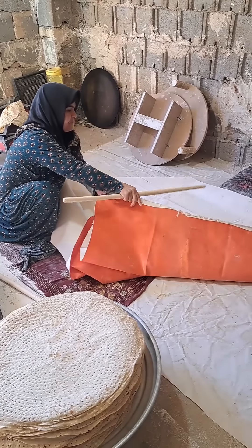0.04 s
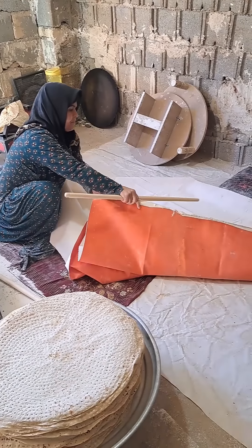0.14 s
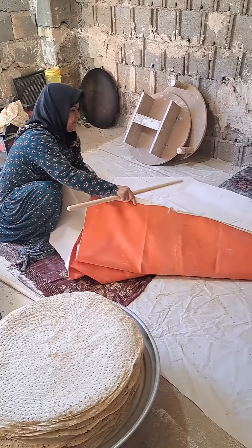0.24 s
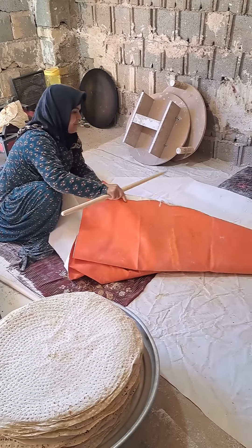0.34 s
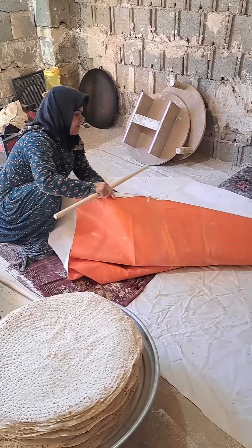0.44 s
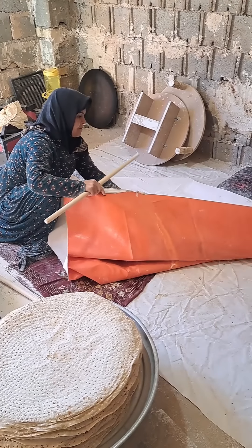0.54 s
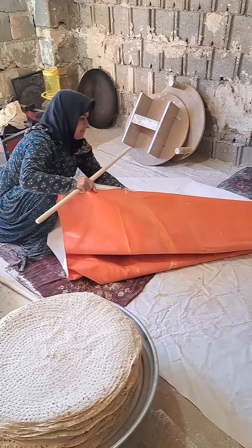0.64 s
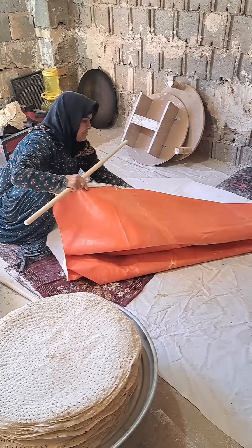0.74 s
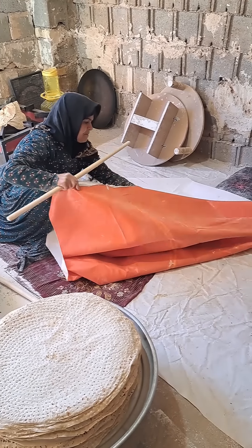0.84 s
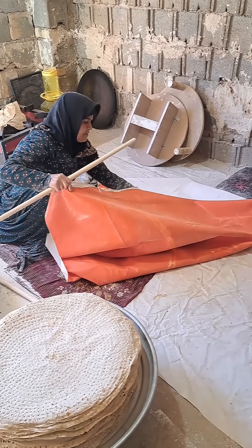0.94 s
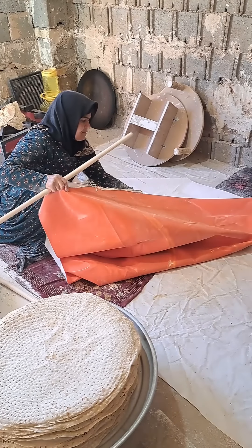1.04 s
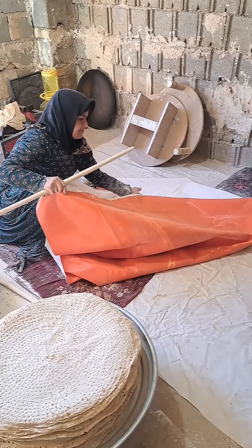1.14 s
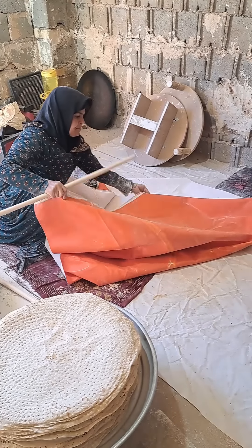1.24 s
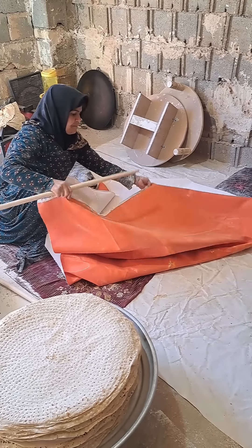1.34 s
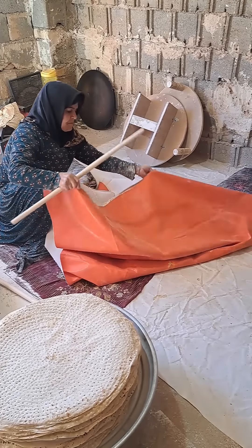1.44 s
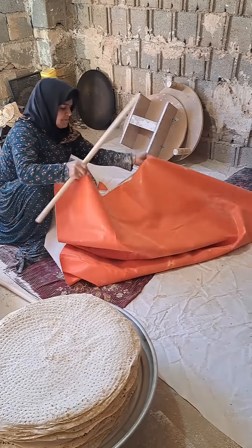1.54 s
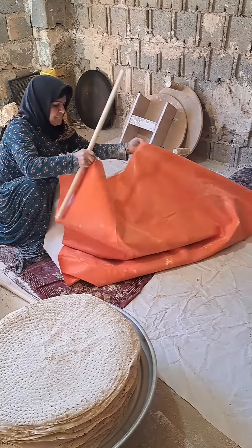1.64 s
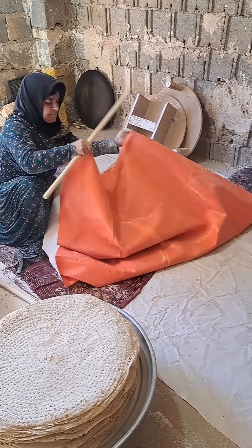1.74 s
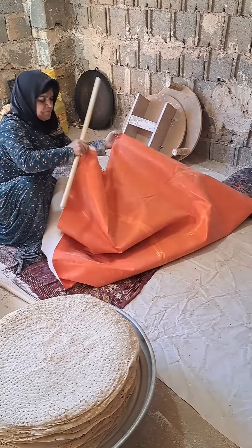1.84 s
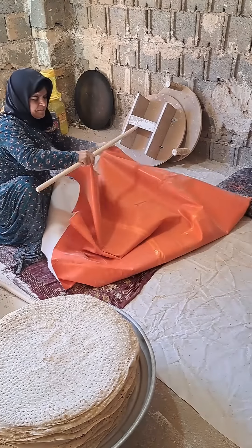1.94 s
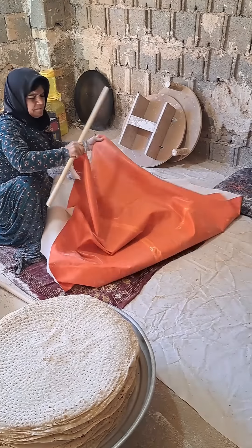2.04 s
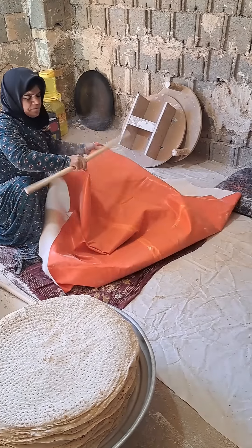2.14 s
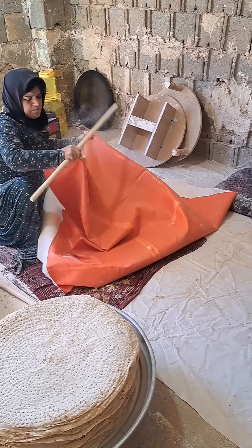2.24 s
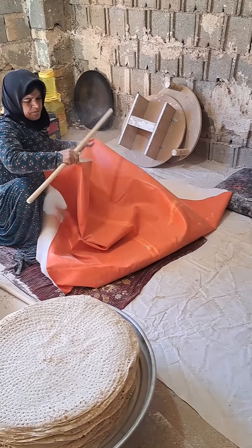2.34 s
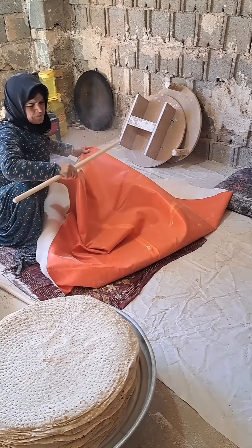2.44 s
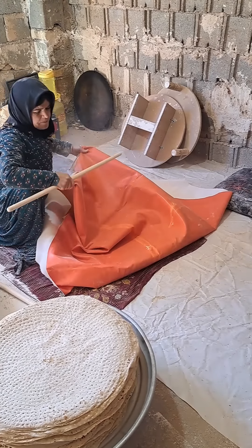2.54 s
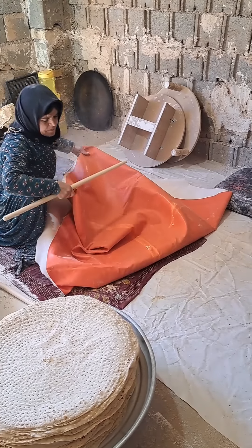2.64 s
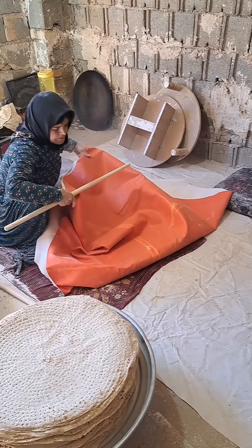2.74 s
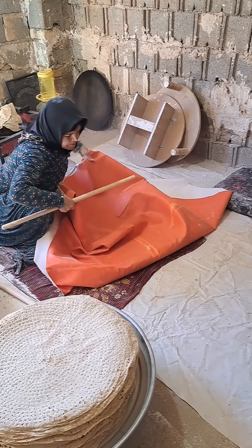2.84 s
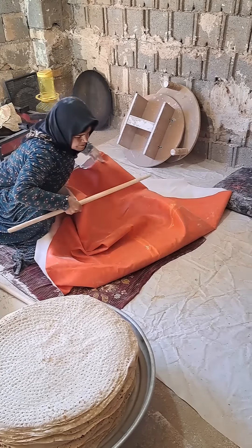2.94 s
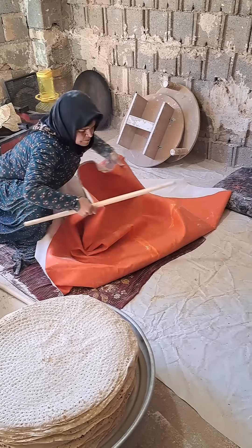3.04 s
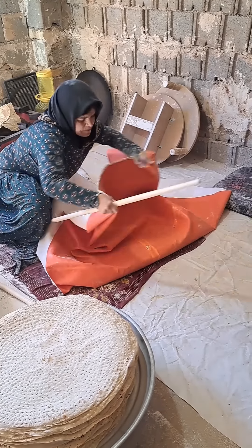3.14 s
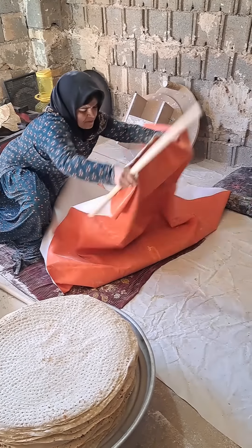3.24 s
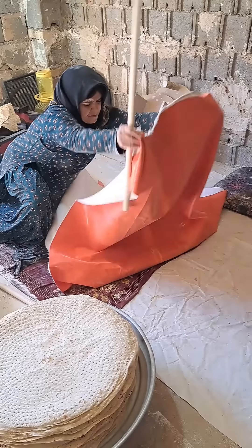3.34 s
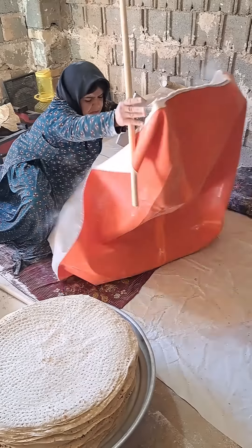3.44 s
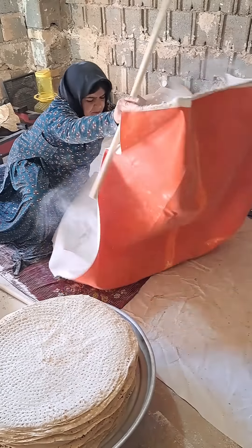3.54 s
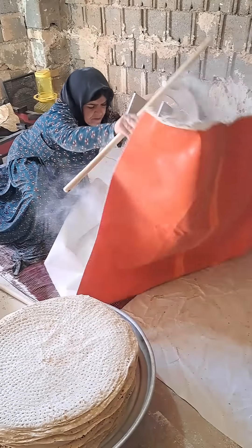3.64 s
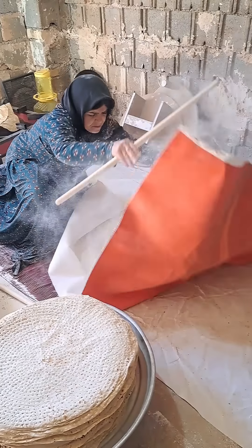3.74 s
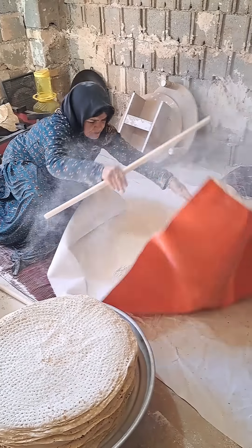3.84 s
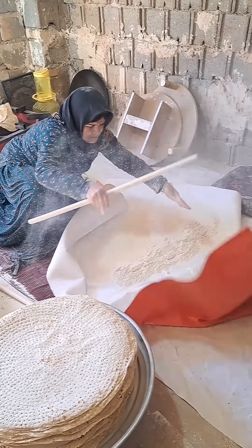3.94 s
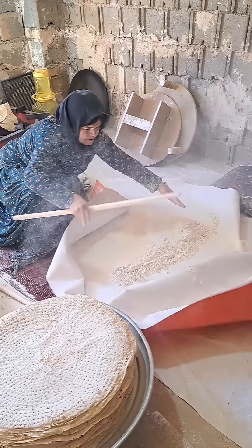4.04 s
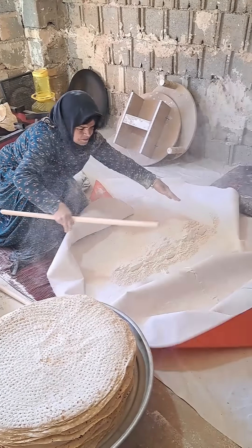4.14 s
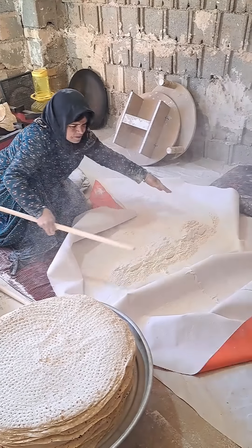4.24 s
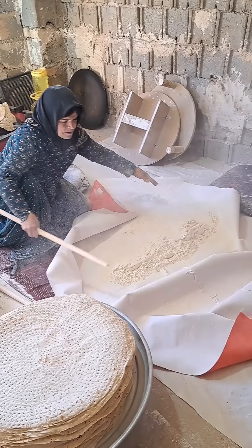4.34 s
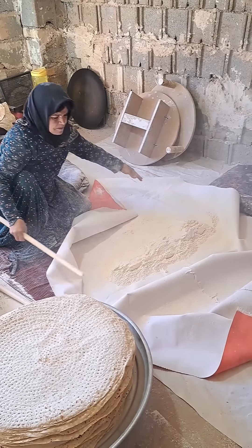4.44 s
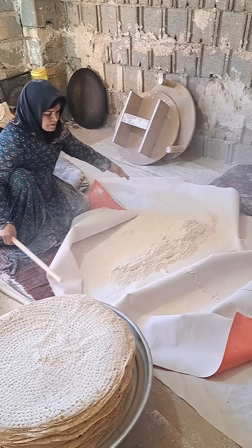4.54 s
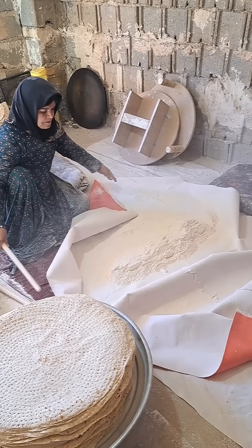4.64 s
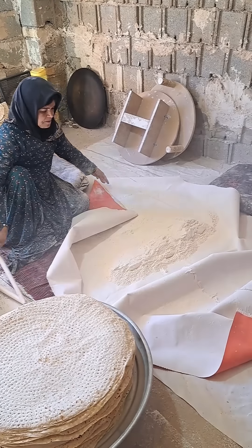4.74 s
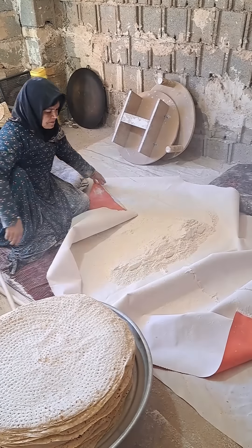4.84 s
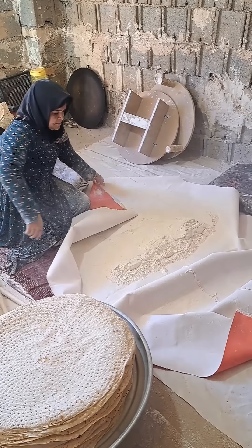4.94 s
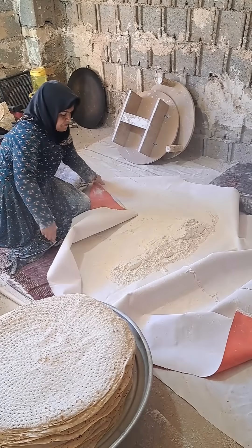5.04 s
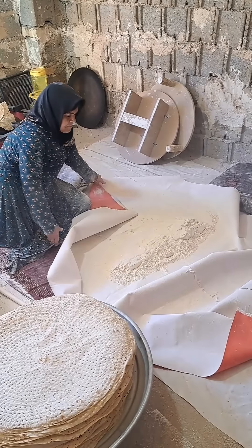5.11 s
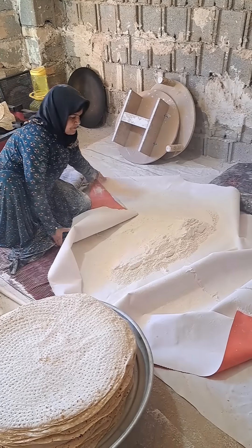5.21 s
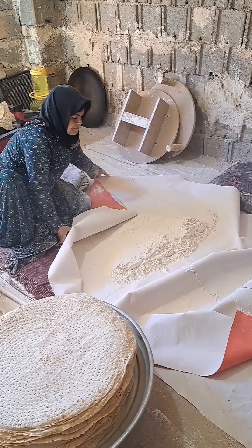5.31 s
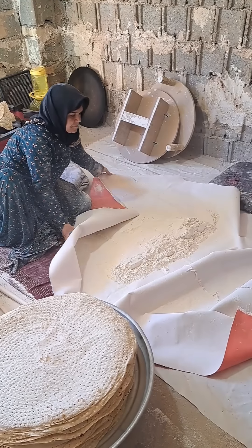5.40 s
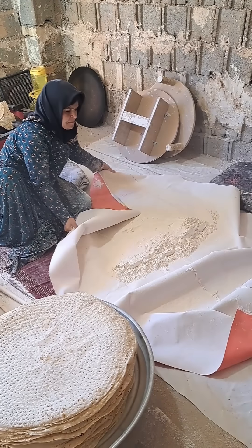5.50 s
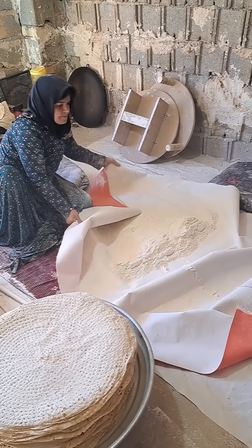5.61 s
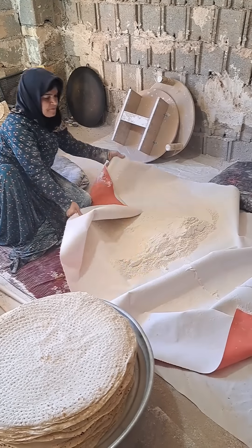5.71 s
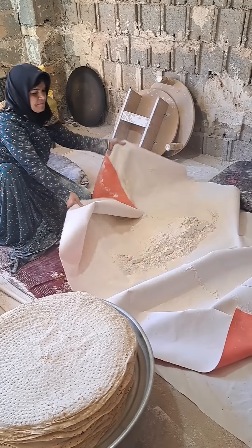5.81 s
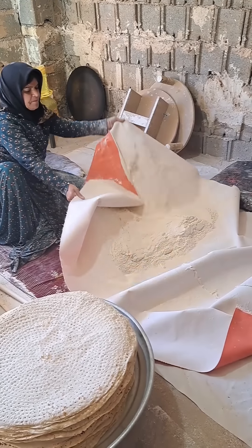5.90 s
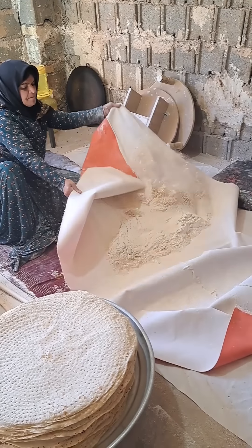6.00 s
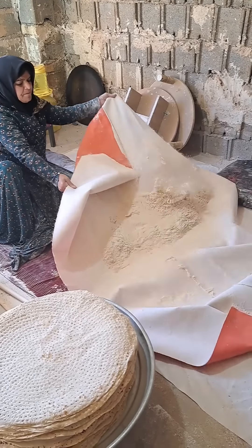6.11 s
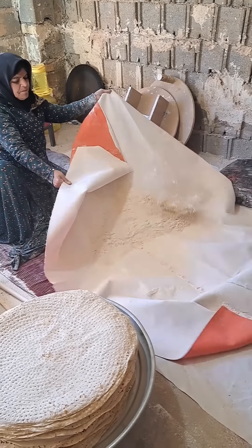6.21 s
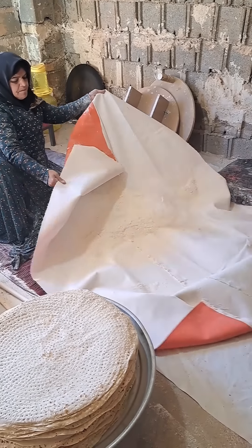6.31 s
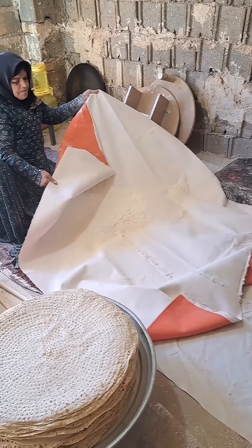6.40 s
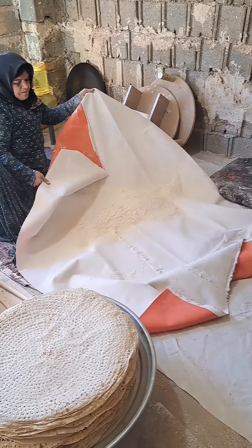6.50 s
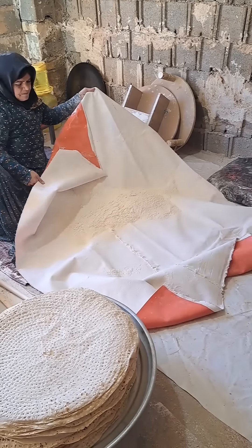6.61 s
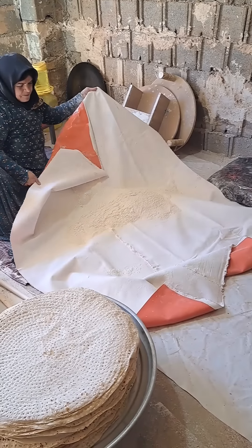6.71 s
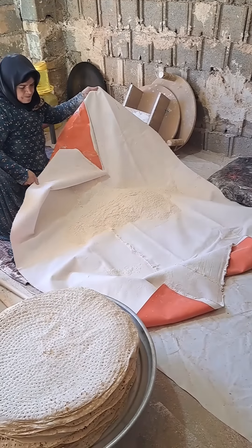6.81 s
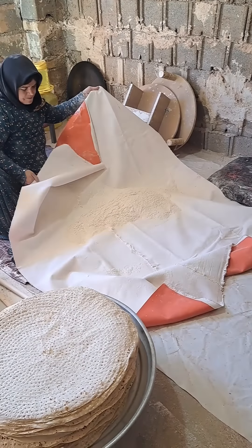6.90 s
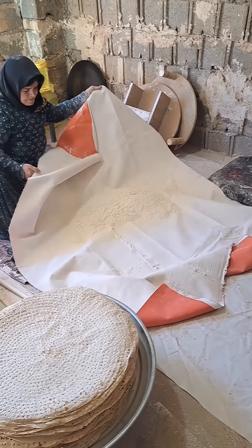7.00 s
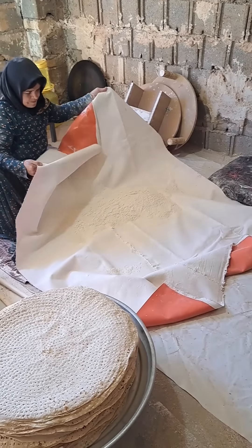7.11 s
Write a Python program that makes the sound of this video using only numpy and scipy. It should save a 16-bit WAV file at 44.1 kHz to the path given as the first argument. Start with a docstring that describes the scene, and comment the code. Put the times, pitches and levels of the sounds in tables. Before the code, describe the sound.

Stiff plastic sheet rustling and flapping with deep pops, a slap, sharp wooden knocks, soft floor bumps, then one long scraping slide indoors.

```python
"""A large plastic-coated cloth is handled in a small brick room, over quiet room air and a faint hum.
At first it is lifted and shaken: shaped noise and tiny clicks rustle, and a loose buzz marks the rubs.
Low noise puffs out from under it, folds pop taut (a crack and a short low tone) and the sheet slaps down.
Then a long wooden rolling pin drops and knocks about, with dull bumps on the floor, built from decaying
tones, with a short noisy clatter in the knocks. Last come a long drag over the floor, a few strokes and a rub."""
import sys
import numpy as np
from scipy import signal
from scipy.fft import rfft, irfft, next_fast_len
from scipy.io import wavfile

SR = 44100
rng = np.random.default_rng(int(sys.argv[2]) if len(sys.argv) > 2 else 0)


def generate_wav(sig):
    """Save sig (samples, or channels by samples) to the path in sys.argv[1] as 16-bit PCM at SR."""
    pcm = np.round(np.clip(np.atleast_2d(sig).T, -1, 1) * 32767).astype(np.int16)
    wavfile.write(sys.argv[1], SR, pcm)


N = 315756   # length of the scene in samples


def from_db(db):
    """Turn decibels into a gain."""
    return 10 ** (np.asarray(db) / 20)


def rms_one(x):
    """Scale a sound to an average strength (rms) of 1."""
    return x / np.sqrt(np.mean(x ** 2) + 1e-20)


def add(out, start, sound):
    """Mix a sound in at a time in seconds, cutting what runs past the end."""
    at = int(start * SR)
    out[..., at:at + sound.shape[-1]] += sound[..., :N - at]


def at_hz(points, hz):
    """Read a table between its points, with pitch spaced as the ear hears it (logarithmically)."""
    point_hz, value = np.transpose(points)
    return np.interp(np.log(hz + 1e-9), np.log(point_hz), value)


def low_pass(x, hz, order=2):
    """Keep what lies below a frequency (Butterworth filter)."""
    sections = signal.butter(order, min(hz, SR / 2 - 1000), fs=SR, output="sos")
    return signal.sosfilt(sections, x + 1e-18)


def drift(rate):
    """Wander by chance along straight lines between random points, 'rate' points a second; rms 1."""
    knots = rng.standard_normal(int(N / SR * rate) + 2)
    return rms_one(np.interp(np.arange(N) * rate / SR, np.arange(len(knots)), knots))


def colour(pair, spectrum):
    """Two unrelated signals become a stereo sound of this spectrum, alike in the bass; rms 1."""
    # How alike the two ears are. Each row: frequency in Hz, correlation (1 is identical).
    likeness = [(100, 0.91), (280, 0.94), (600, 0.35), (1200, 0), (2500, 0.1), (8000, 0)]
    size = next_fast_len(pair.shape[1])
    hz = np.arange(size // 2 + 1) * SR / size
    bass_cut = hz / np.hypot(hz, 20)   # fades out below about 20 Hz
    mid, side = rfft(pair, size) * from_db(at_hz(spectrum, hz)) * bass_cut
    alike = np.clip(at_hz(likeness, hz), -1, 1)
    both = np.sqrt(1 + alike) * mid + np.sqrt(1 - alike) * side * [[1], [-1]]
    return rms_one(irfft(both, size)[:, :pair.shape[1]])


def noise(spectrum, size=N):
    """Smooth stereo noise of this spectrum."""
    return colour(rng.standard_normal((2, size)), spectrum)


def grains(spectrum, per_s, spread_db, hiss_db):
    """Tiny slips and buckles of uneven size over a bed of smooth friction."""
    sizes = from_db(spread_db * np.minimum(rng.exponential(1, N), 4))
    happens = rng.random(N) < per_s / SR
    clicks = happens * sizes * rng.standard_normal((2, N))
    hiss = from_db(hiss_db) * rng.standard_normal((2, N))
    return colour(rms_one(clicks) + hiss, spectrum)


def struck(modes, t, spread_db, apart_hz=1100):
    """Decaying modes, shared differently by each blow; short waves reach the two ears out of step."""
    out = np.zeros((2, len(t)))
    for k, (hz, db, t60) in enumerate(modes):
        turn = min((hz / apart_hz) ** 2, 1) * rng.uniform(0, np.pi / 2) * np.array([[-1], [1]])
        fading = from_db(db + spread_db * rng.standard_normal() - 60 * t / t60)
        sign = (-1) ** k   # every other mode starts the opposite way
        out += sign * fading * np.sin(2 * np.pi * hz * t + turn)
    return out


def room(x, wet_db):
    """Direct sound plus the dense, short tail of brick walls, whose treble dies first."""
    # Colour of the tail. Each row: frequency in Hz, relative level in dB per Hz.
    wall_spectrum = [(60, -3.5), (250, 2), (700, -3.5), (4000, -4), (15000, 0.5)]
    # seconds to fall by 60 dB, for the dull and the bright part; where the two parts meet
    dull_t60, treble_t60, treble_hz = 0.22, 0.19, 2230
    t = np.arange(SR // 2) / SR
    air = noise(wall_spectrum, size=len(t))
    dull = low_pass(air, treble_hz, order=1)
    tail = dull * from_db(-60 * t / dull_t60) + (air - dull) * from_db(-60 * t / treble_t60)
    tail *= np.clip(t / 0.0027 - 1, 0, 1)   # silent for 2.7 ms, then fades in over as long
    tail /= np.sqrt(np.sum(tail ** 2) / 2)
    return x + from_db(wet_db) * signal.fftconvolve(np.atleast_2d(x), tail, axes=1)[:, :N]


def near_walls(pair, above_hz=700):
    """Early echoes from floor and near walls comb the upper range, differently at each ear."""
    # Each row: left delay in seconds, right delay in seconds, level in dB.
    echoes = [(.0021, 0.0012, -22.5), (.0047, 0.0065, -16.5), (.0093, 0.0067, -16.5), (0.013, 0.017, -20.5)]
    out = pair.copy()
    bright = pair - low_pass(pair, above_hz, order=1)
    for left_s, right_s, db in echoes:
        add(out[0], left_s, from_db(db) * bright[0])
        add(out[1], right_s, from_db(db) * bright[1])
    return out


def background():
    """Quiet room air as shaped noise, with a faint hum of steady level whose phase wanders."""
    # Colour of the room air. Each row: frequency in Hz, relative level in dB per Hz.
    air_spectrum = [(18, -47.5), (30, 0), (98, -2), (449, -8), (540, -11.5), (801, -3), (1220, -6),
                    (1460, 0), (1910, -21), (3220, -14), (3490, -19.5), (5040, -4.5), (8980, -16),
                    (12600, -15.5), (16000, -44)]
    # The hum. Each row: frequency in Hz, rms level in dB.
    hum_tones = [(113, -76), (786, -72.5)]
    air_db = -59.5
    t = np.arange(N) / SR
    hum = np.zeros(N)
    for hz, db in hum_tones:
        hum += np.sqrt(2) * from_db(db) * np.sin(2 * np.pi * hz * t + drift(6.5))
    return from_db(air_db) * noise(air_spectrum) + hum


def stroke(start, length):
    """Gain of one stroke: it swells as the hand gathers speed and fades as it comes to rest."""
    rise = 0.37   # share of the stroke in which the hand gathers speed
    edge_db, flatness = -10.5, 1.95   # level at start and end; a higher flatness holds the top longer
    along = (np.arange(N) / SR - start) / length - rise
    from_peak = np.minimum(np.abs(along) / np.where(along < 0, rise, 1 - rise), 3)
    return from_db(edge_db * from_peak ** flatness)


def handling():
    """Gains of sliding, crumpling and billowing: the long drag and all strokes add in power."""
    # One pull, lift or shake of the sheet. Each row: start in seconds, length in seconds,
    # then the levels of sliding, crumpling and billowing in dB.
    strokes = [(0.0, 0.18, -43, -48, -54.5), (0.202, .31, -44, -46.5, -54.5),
               (0.469, 0.22, -58, -51, -55.5), (0.698, 0.2, -46.5, -49, -49.5),
               (0.844, 0.25, -47, -49, -50.5), (1.107, 0.28, -54, -53, -57.5),
               (1.35, .19, -53.5, -53, -53.5), (1.58, 0.35, -53, -55.5, -58.5),
               (1.78, 0.081, -44.5, -66, -62), (1.92, 0.16, -53, -46, -42), (2.043, 0.13, -49, -45, -47.5),
               (2.126, 0.22, -49.5, -48.5, -46.5), (2.365, 0.2, -55.5, -51.5, -55.5),
               (2.585, 0.53, -63, -64, -63), (3.068, 0.25, -54.5, -54.5, -49),
               (3.209, 0.34, -47.5, -48, -45.5), (3.609, 0.15, -50.5, -46.5, -46.5),
               (3.714, .09, -44, -46, -55), (3.846, 0.28, -47.5, -45.5, -44),
               (4.142, 0.11, -43.5, -50, -54), (4.222, 0.091, -40.5, -42.5, -42.5),
               (4.255, 0.28, -64, -64, -50.5), (5.09, 0.44, -53, -42, -45),
               (5.42, 0.18, -51.5, -49.5, -42.5), (5.555, 0.52, -58, -58, -57),
               (5.891, 0.17, -70, -54, -43), (6.598, 0.094, -58, -39, -45.5), (6.82, .14, -60, -59, -80),
               (6.92, .25, -50, -51, -88)]
    # The long drag over the floor.
    # Each row: time in seconds, sliding in dB (only the swing below the top counts).
    drag = [(5.88, -64.5), (6.04, -44), (6.118, -41), (6.224, -31), (6.336, -29), (6.504, -32),
            (6.668, -43.5), (6.78, -73)]
    slide_db, crumple_db, billow_db = -24.5, -40.5, -53   # gains where the drag is fastest
    follows = 0.46   # share of the sliding's swing that crumpling and billowing follow
    s, db = np.transpose(drag)
    swing = np.interp(np.arange(N) / SR, s, db - db.max(), left=-np.inf, right=-np.inf)
    drag_db = [slide_db + swing, crumple_db + follows * swing, billow_db + follows * swing]
    power = from_db(drag_db) ** 2
    for start, length, *levels_db in strokes:
        power += np.outer(from_db(levels_db), stroke(start, length)) ** 2
    return np.sqrt(power)


def rustle():
    """Sliding hisses, buckling creases crackle, and the moving sheet pushes lumps of air."""
    # Colours of the three sounds. Each row: frequency in Hz, relative level in dB per Hz.
    slide_spectrum = [(35, -43), (60, -29), (164, -22.5), (287, 0.5), (371, 3), (458, -9), (767, -3.5),
                      (1040, -6), (1820, -1), (3040, -2), (4970, -1), (8120, -5.5), (9130, -9),
                      (12400, -5.5), (16000, -18)]
    crumple_spectrum = [(150, -35), (300, 2.5), (650, 9.5), (1000, 1.5), (1600, 2.5), (2500, -5),
                        (4000, -11), (8000, -27)]
    billow_spectrum = [(20, -22), (40, -16), (58, 3), (100, -10.5), (140, -2), (230, 3), (310, 4.5),
                       (450, -8), (900, -37)]
    sliding, crumpling, billowing = handling()
    # each sound also wavers quickly by chance
    slide = sliding * from_db(0.69 * drift(45))
    slide = slide * grains(slide_spectrum, per_s=5000, spread_db=1.0, hiss_db=5)
    crumple = crumpling * from_db(3.0 * drift(50))
    crumple = crumple * grains(crumple_spectrum, per_s=1200, spread_db=2.5, hiss_db=3.0)
    billow = billowing * from_db(1.27 * drift(35)) * noise(billow_spectrum)
    return from_db(-1.04) * slide + from_db(-3.0) * crumple + from_db(-1.87) * billow


def rubs(width_hz=330):
    """A palm or fold drags across the cloth: the weave buzzes in a loose band of gliding pitch."""
    # Each row: start in seconds, end in seconds, level in dB, first pitch in Hz, last pitch in Hz.
    rub_list = [(0.0, 0.158, -53, 1580, 1564), (0.317, 0.417, -49.5, 624.6, 559),
                (1.926, 1.972, -50, 1380, 1814), (2.058, 2.129, -53, 1890, 2360),
                (2.132, 2.238, -54, 12500, 12600), (3.113, 3.212, -49, 1098, 2554),
                (6.852, 7.16, -52.5, 799, 2000)]
    out = np.zeros((2, N))
    for start, end, db, first_hz, last_hz in rub_list:
        along = np.linspace(0, 1, max(int((end - start) * SR), 256))
        phase = 2 * np.pi * np.cumsum(first_hz * (last_hz / first_hz) ** along) / SR
        # slow noise blurs the tone into a band, wider for a higher first pitch
        blur_hz = width_hz * np.sqrt(first_hz / 1000)
        a, b = low_pass(rng.standard_normal((2, 2, len(along))), blur_hz)
        buzz = rms_one(a * np.cos(phase) + b * np.sin(phase))
        add(out, start, from_db(db) * np.sin(np.pi * along) * buzz)
    return out


def puffs(top_hz=100):
    """Air pressed out from under the sheet escapes with a low rumble, the same in both channels."""
    # Each row: start in seconds, end in seconds, level in dB.
    puff_list = [(0.552, 0.85, -64), (2.145, 2.326, -47), (3.199, 3.587, -46.5), (4.233, 4.535, -45),
                 (5.899, 6.012, -50.5)]
    out = np.zeros(N)
    for start, end, db in puff_list:
        swell = np.hanning(max(int((end - start) * SR), 256))
        rumble = rms_one(low_pass(rng.standard_normal(len(swell)), top_hz, order=4))
        add(out, start, from_db(db) * swell * rumble)
    return out


def flaps(cycles=3.8, swell_hz=59, swell_db=-17, swell_t60=0.16, swell_rise=0.016):
    """A fold snaps taut: a short crack, a few cycles of the air pocket and a slow swing of the whole sheet."""
    # Each row: start in seconds, level in dB, strength of the crack in dB against that level,
    # upper edge of the crack in Hz, time for the crack to fall by 60 dB in seconds.
    flap_list = [(1.704, -35, -21, 690, .04), (1.736, -25.5, -6, 920, 0.044), (1.930, -48.5, 10, 1820, .09),
                 (2.161, -43, 9.5, 1300, 0.18), (3.231, -43, 9.5, 900, .07), (3.283, -27.5, -3, 600, 0.047),
                 (3.299, -33, 5, 2700, 0.039), (3.315, -25.5, 5.5, 1020, 0.1), (3.346, -23.5, 0, 600, .11),
                 (3.386, -37, -2, 700, .085), (3.693, -16.5, -4.5, 1450, .025),
                 (3.715, -31, -4, 1315, 0.033), (3.795, -17, -9, 1200, .047), (3.826, -37, 11, 1000, .048),
                 (3.885, -19, -12, 1540, .044), (3.908, -28, -14, 1500, .04),
                 (4.051, -37.5, 3, 1720, 0.033), (5.903, -34.5, -5, 600, 0.044)]
    pocket_hz, pocket_spread = 270, .06   # pitch of the air pocket; its relative scatter from fold to fold
    out, t = np.zeros(N), np.arange(SR // 4) / SR
    for s, db, crack_db, edge_hz, crack_t60 in flap_list:
        hz = pocket_hz * np.exp(pocket_spread * rng.standard_normal())
        # the pocket falls by 30 dB in the given number of cycles
        pocket = np.sin(2 * np.pi * hz * t) * from_db(-60 * t * hz / (2 * cycles))
        swing = np.sin(2 * np.pi * swell_hz * t) * np.minimum(t / swell_rise, 1)
        swing = swing * from_db(swell_db - 60 * t / swell_t60)
        crack = rms_one(low_pass(rng.standard_normal(len(t)), edge_hz, order=3))
        crack = crack * from_db(crack_db - 60 * t / crack_t60) / 2
        add(out, s, (pocket + swing + crack) * from_db(db))
    return from_db(1.5) * room(out, wet_db=-4.5)


def slaps(bright_hz=4000):
    """The contact spreads over the sheet as a dense burst of little smacks, then dies away."""
    # The sheet slaps or brushes a surface. Each row: start in seconds, level in dB, rise in seconds,
    # hold in seconds, gain of the bright part in dB.
    slap_list = [(3.138, -41.5, 0.026, .005, -1), (3.759, -26.5, 0.014, 0.013, 0),
                 (3.869, -23.5, 0.0081, 0.042, 4.5), (5.12, -37.5, 0.019, 0.042, -6),
                 (5.172, -39, 0.013, 0.034, 0), (5.313, -37, 0.024, 0.028, -4)]
    # Colour of the smacks. Each row: frequency in Hz, relative level in dB per Hz.
    slap_spectrum = [(50, -9), (130, 0), (280, 11.5), (500, 2.5), (1100, 1.5), (2300, 1.5), (5000, -5.5),
                     (8000, -9.5), (9500, -13), (12500, -9), (16000, -20)]
    slap_t60 = 0.21   # seconds to fall by 60 dB
    out, t = np.zeros((2, N)), np.arange(SR // 2) / SR
    smacks = grains(slap_spectrum, per_s=3200, spread_db=-1, hiss_db=8.5)
    for s, db, rise, hold, bright_db in slap_list:
        burst = smacks[:, int(s * SR):][:, :len(t)]
        dull = low_pass(burst, bright_hz, order=1)
        fade_db = -60 * np.maximum(t - rise - hold, 0) / slap_t60
        shape = np.minimum(t / rise, 1) * from_db(db + fade_db)
        add(out, s, shape * (dull + from_db(bright_db) * (burst - dull)))
    return out


def rolling_pin(clatter_t60=0.083, clatter_low_hz=600, tick_db=-30, rise_s=0.0016):
    """Each knock rings both woods and rattles the ground briefly; a soft contact reaches only the low modes."""
    # Each row: start in seconds, rolling pin in dB, neighbouring stick in dB, hardness of the contact in Hz.
    knocks = [(4.7601, -13, -27, 4640), (4.7709, -18, -24, 5040), (4.799, -36, -24, 4000),
              (4.854, -44, -24, 2760), (4.868, -50, -22, 1570), (4.89, -50, -36.5, 2380),
              (5.118, -34, -22, 1730), (5.181, -34, -20, 3000), (5.304, -29.5, -27, 4050),
              (5.334, -31, -46, 3370)]
    # Ringing tones (modes) of the pin, then of the stick it lands on.
    # Each row: frequency in Hz, level in dB, time to fall by 60 dB in seconds.
    pin_modes = [(442, -15.5, 0.17), (910, -15, 0.21), (1452, 3, 0.07), (1766, -1, 0.083),
                 (1850, -2, 0.055), (2116, 0, 0.07), (2160, -2.5, 0.14), (2478, -2.5, 0.081),
                 (2928, 5, 0.084), (3260, -6, 0.09), (3634, -0.5, 0.082), (3973, -4, 0.07),
                 (4060, 7, 0.049), (4625, -4.5, 0.066), (5440, -16, 0.082)]
    stick_modes = [(821, -9.5, 0.099), (1312, -7, 0.14), (1425, -2, 0.17), (1480, -9, .1),
                   (1730, -10, 0.075), (1930, -5, 0.12), (2056, -5.5, .08), (2120, -6, 0.087),
                   (2535, -7, 0.072), (2820, -15, .06), (3330, -10, .06)]
    rings, clatters, t = np.zeros((2, N)), np.zeros(N), np.arange(SR // 3) / SR
    contact = np.minimum(t / rise_s, 1)
    for s, pin_db, stick_db, hard_hz in knocks:
        pin = from_db(pin_db) * struck(pin_modes, t, spread_db=2.5)
        stick = from_db(stick_db) * struck(stick_modes, t, spread_db=1.5)
        # the ground's rattle follows the louder of the two woods
        clatter_db = max(pin_db, stick_db) - 5.5
        clatter = rng.standard_normal(len(t)) * from_db(clatter_db - 60 * t / clatter_t60) * contact
        clatter = clatter - 0.43 * low_pass(clatter, clatter_low_hz, order=1)   # thin sticks radiate little bass
        add(rings, s, low_pass((pin + stick) * contact, hard_hz, order=4))
        add(clatters, s, low_pass(clatter, hard_hz, order=4) + from_db(tick_db) * clatter)
    left, right = from_db(-3.5) * room(rings, wet_db=-6.0) + from_db(3.5) * room(clatters, wet_db=6.0)
    # the wood lies to the right: the left ear hears it 4 samples later and weaker
    return np.array([from_db(-2) * np.roll(left, 4), right])


def bumps():
    """Soft, heavy contacts on the floor boom in a few low modes."""
    # Each row: start in seconds, level in dB, hardness of the contact in Hz.
    bump_list = [(5.118, -23.5, 600), (5.126, -17.5, 292), (5.342, -30, 597), (5.463, -34, 504),
                 (5.524, -34, 396)]
    # Modes that a bump sets ringing.
    # Each row: frequency in Hz, level in dB, time to fall by 60 dB in seconds.
    floor_modes = [(133, -26.5, .15), (199, -8.5, 0.45), (234.8, -1, 0.18), (331, -10.5, 0.17),
                   (416, -21, 0.074), (502, -13.5, 0.13), (571, -5.5, 0.18), (646, -8, 0.12)]
    out, t = np.zeros((2, N)), np.arange(SR // 2) / SR
    for s, db, hard_hz in bump_list:
        boom = struck(floor_modes, t, spread_db=3.0)
        add(out, s, from_db(db) * low_pass(boom, hard_hz))
    return room(out, wet_db=-10.5)


def scene():
    """Mix all sources; sheet and pin lie a little to the right, the background is left as it is."""
    # Lean of the sound. Each row: frequency in Hz, left minus right in dB.
    lean = [(60, 0.5), (130, 2), (280, -3.5), (550, .8), (1100, -1.5), (2200, -1.5), (4500, -3), (8000, -5),
            (12500, 1.6)]
    cloth = near_walls(rustle() + slaps() + rubs())
    work = cloth + puffs() + flaps() + rolling_pin() + bumps()
    size = next_fast_len(N)
    lean_db = at_hz(lean, np.arange(size // 2 + 1) * SR / size)
    ear_gains = from_db(np.array([[1], [-1]]) * lean_db / 2)
    return irfft(rfft(work, size) * ear_gains, size)[:, :N] + background()


def record(dry):
    """The deepest bass is rolled off, the microphone rounds the highest peaks and the top is cut steeply."""
    peak_limit, cutoff_hz = 1, 15800
    thinned = signal.sosfilt(signal.butter(3, 38, "high", fs=SR, output="sos"), dry)
    rounded = peak_limit * np.tanh(thinned / peak_limit)
    return signal.sosfilt(signal.ellip(12, .1, 80, cutoff_hz, fs=SR, output="sos"), rounded)


dry = scene()
out = record(dry)
generate_wav(out)
```